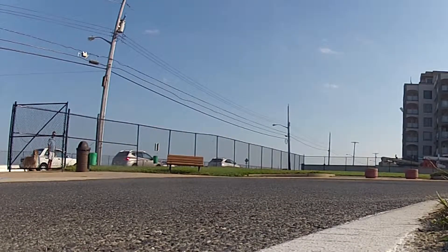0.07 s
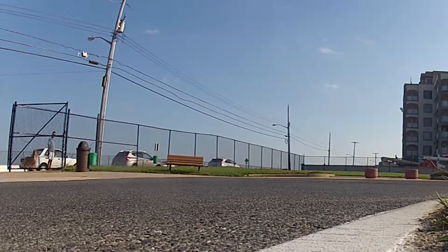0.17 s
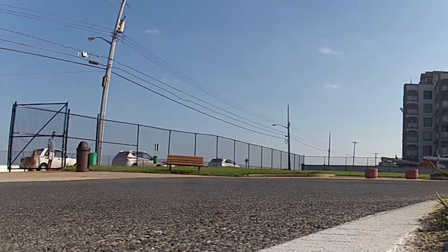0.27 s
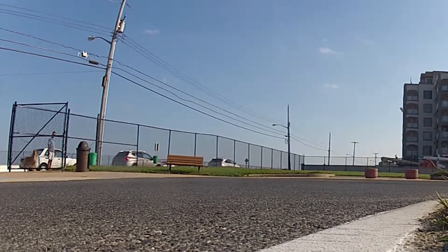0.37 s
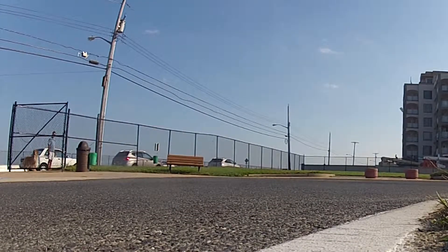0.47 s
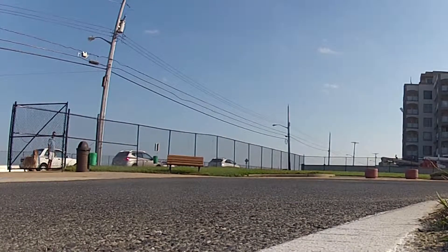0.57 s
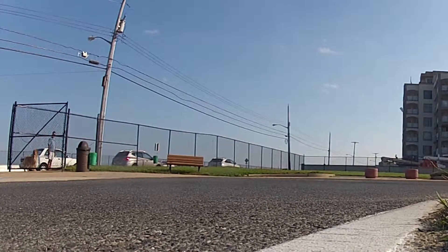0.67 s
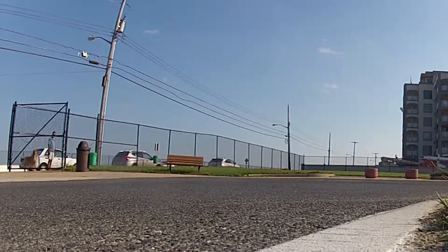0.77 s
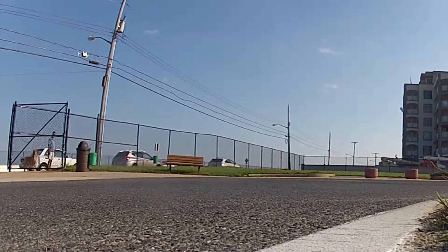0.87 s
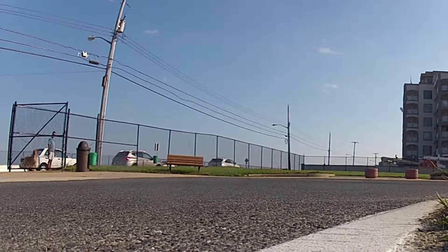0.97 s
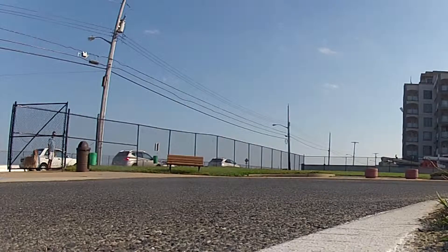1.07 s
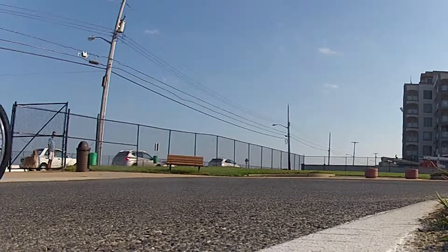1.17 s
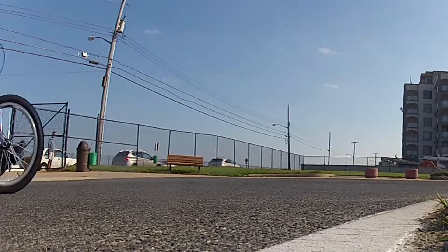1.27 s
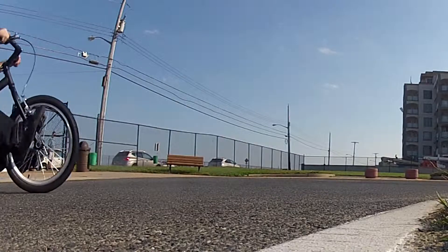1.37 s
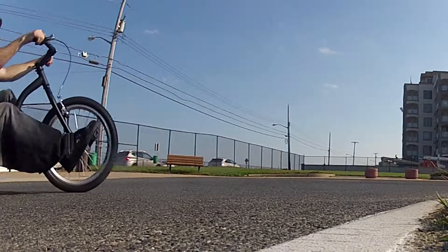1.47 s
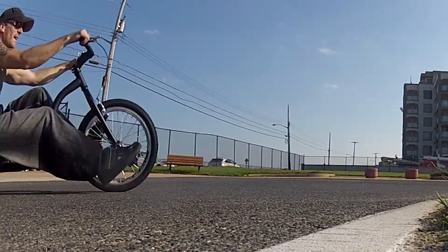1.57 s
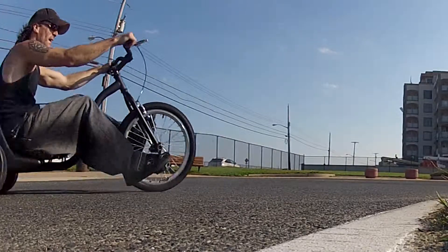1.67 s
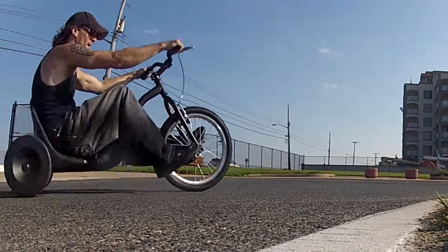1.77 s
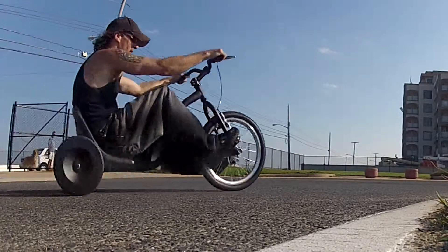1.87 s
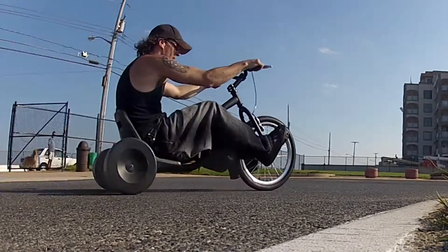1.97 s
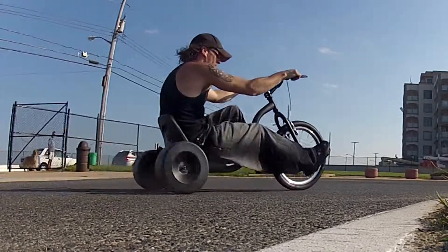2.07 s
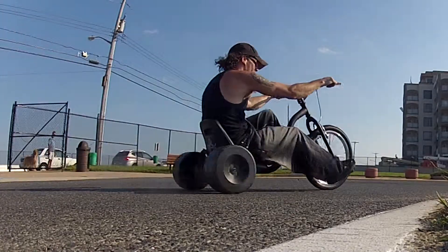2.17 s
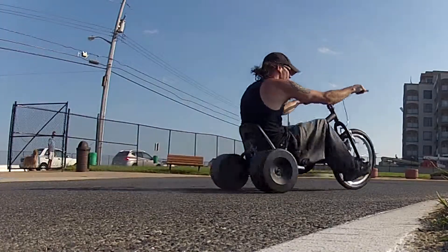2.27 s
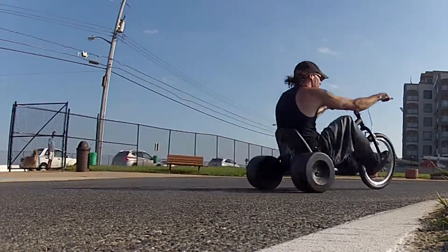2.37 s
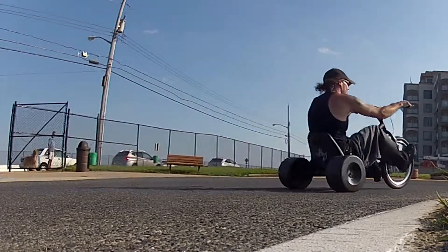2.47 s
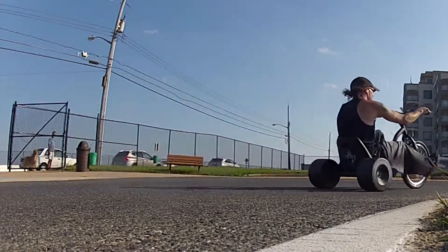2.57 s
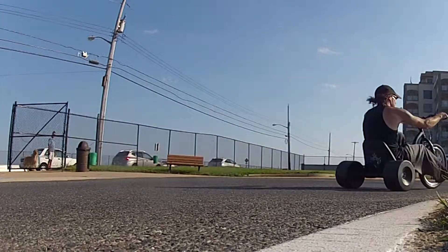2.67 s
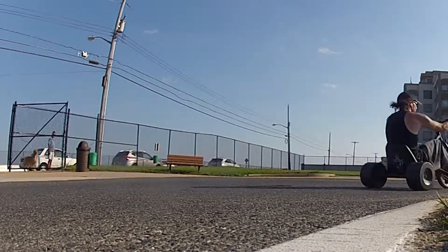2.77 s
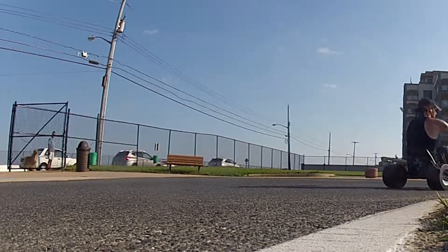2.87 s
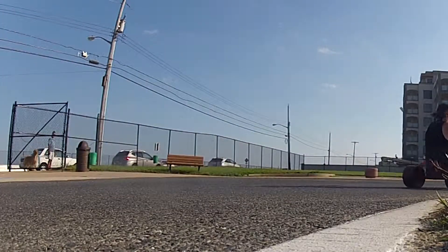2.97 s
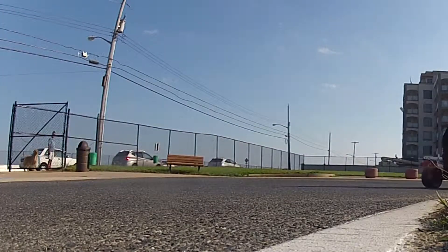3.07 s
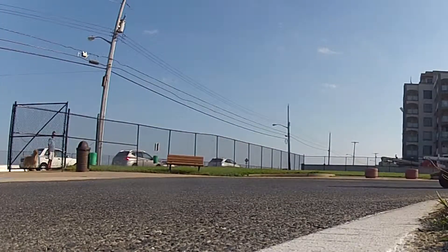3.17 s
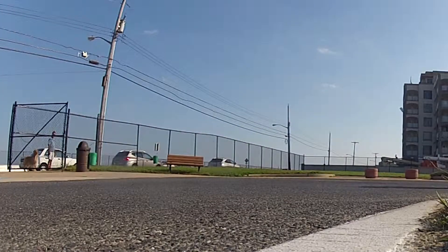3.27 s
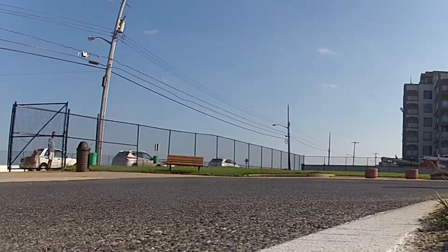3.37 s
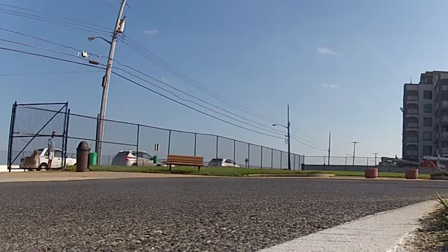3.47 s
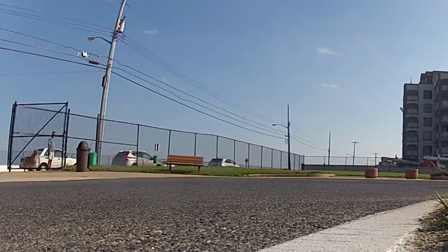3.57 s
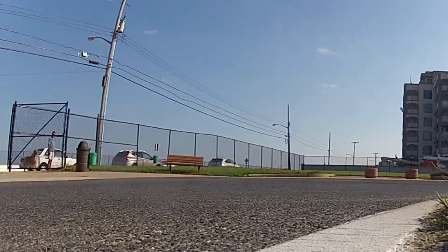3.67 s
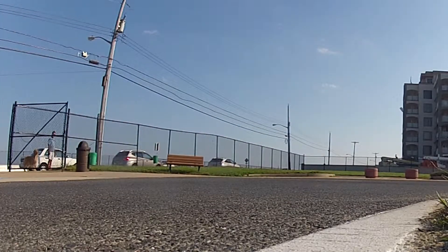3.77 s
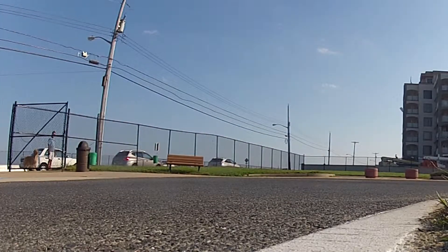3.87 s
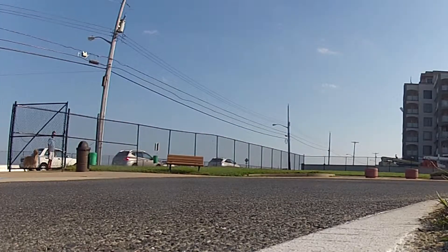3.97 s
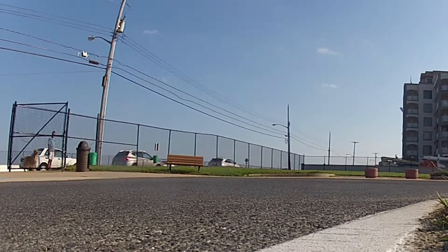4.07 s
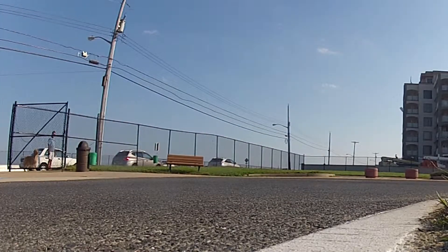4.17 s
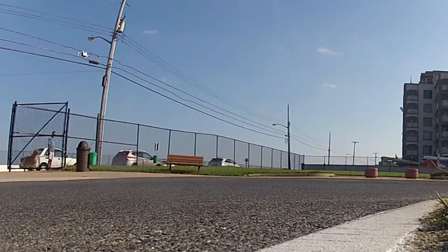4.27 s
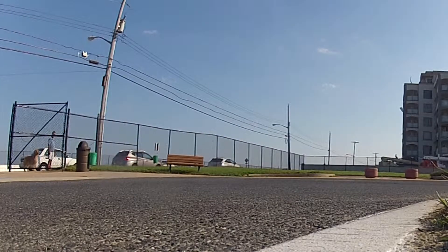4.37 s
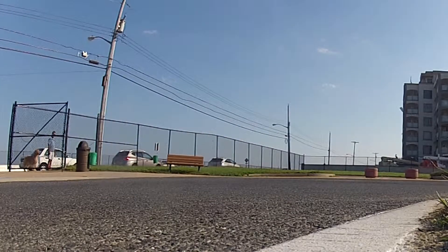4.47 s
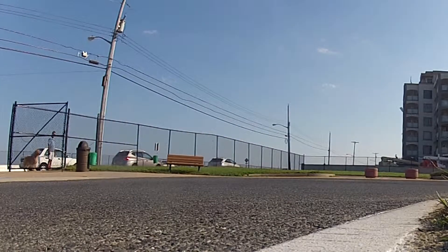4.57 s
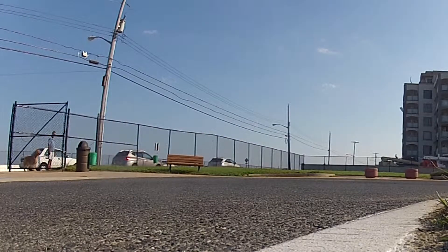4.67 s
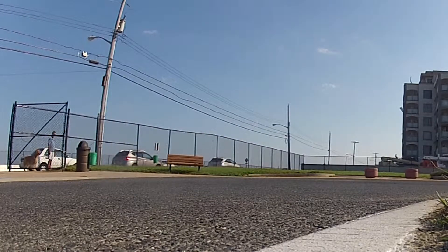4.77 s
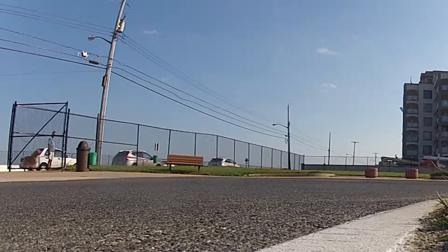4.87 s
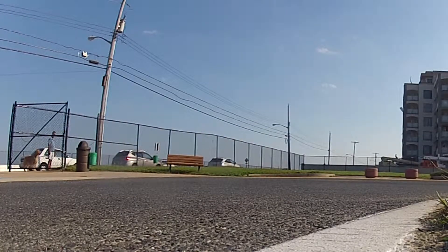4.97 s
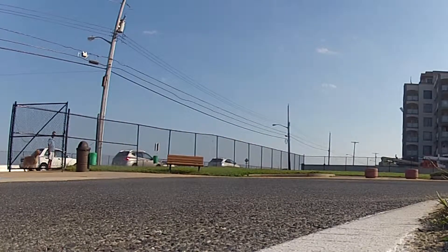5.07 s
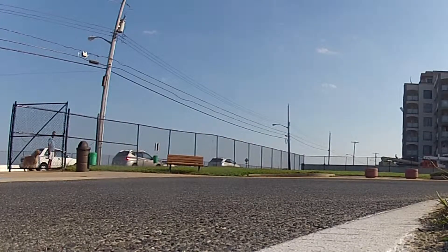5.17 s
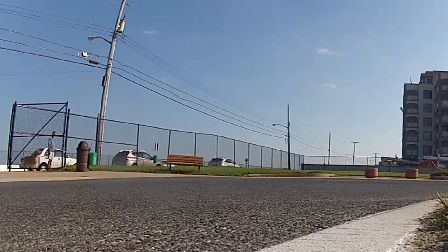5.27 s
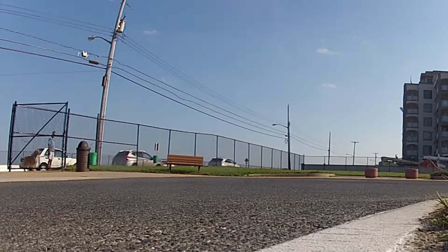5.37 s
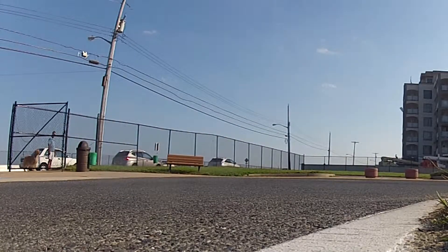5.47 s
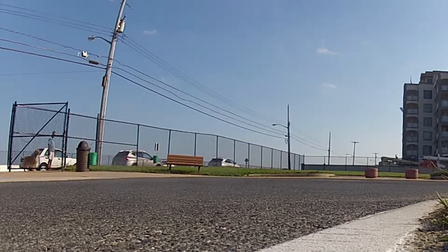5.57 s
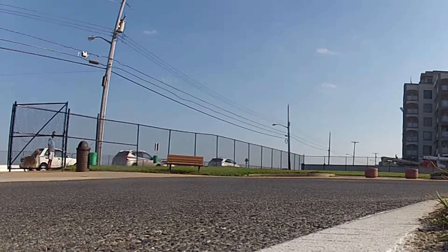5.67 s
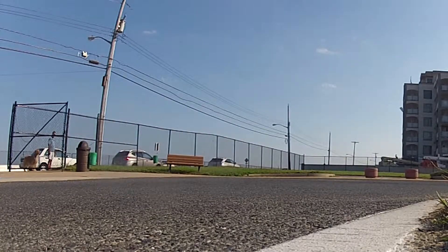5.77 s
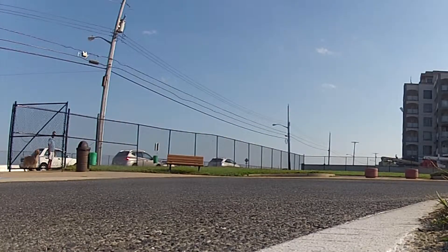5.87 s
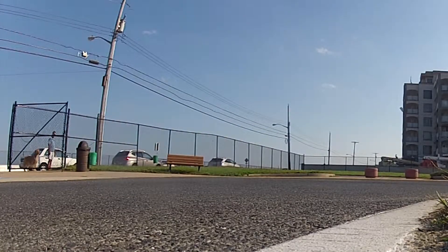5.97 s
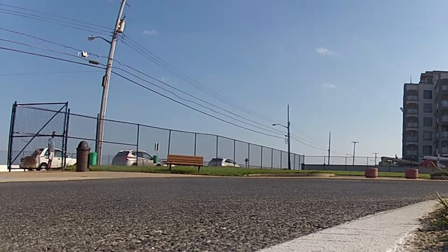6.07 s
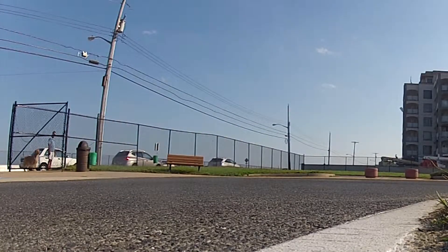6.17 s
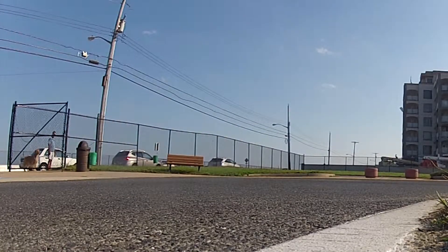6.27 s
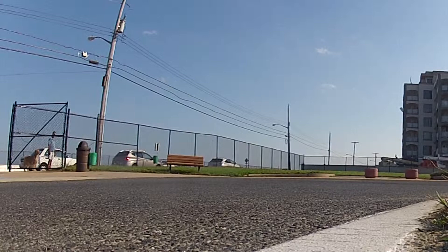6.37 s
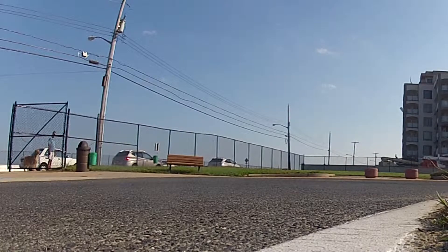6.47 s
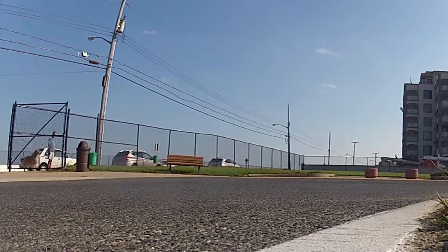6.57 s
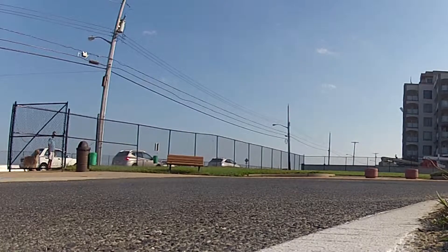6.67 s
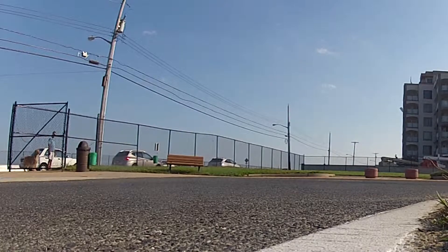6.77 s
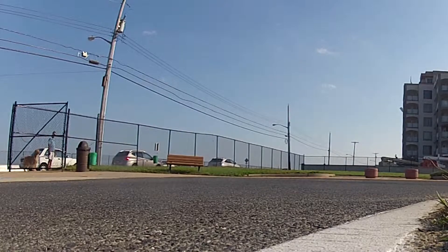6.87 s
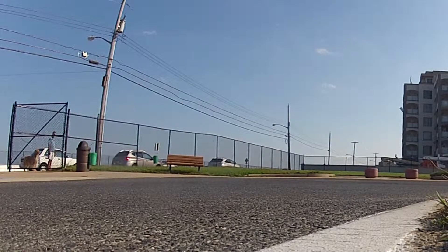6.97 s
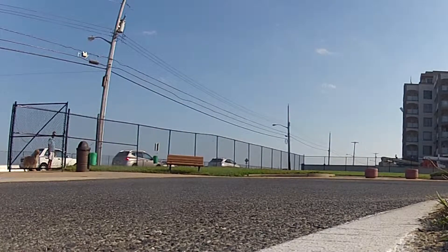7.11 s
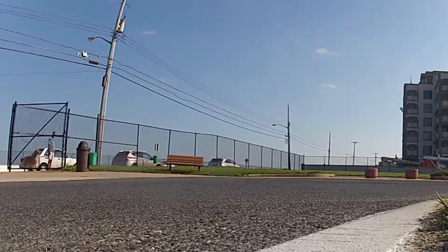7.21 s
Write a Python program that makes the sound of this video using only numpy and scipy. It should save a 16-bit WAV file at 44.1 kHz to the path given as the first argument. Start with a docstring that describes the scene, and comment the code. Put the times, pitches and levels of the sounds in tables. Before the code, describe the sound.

A trike approaches on an open asphalt road, heard from a microphone on the ground. From the start its hollow plastic rear wheels drum on the rough surface, growing louder, while loose stones snap sharply, most strongly at about 0.6 and 1.3 seconds. It passes close between 1.5 and 2.3 seconds with a booming rumble, a few knocks and a light hiss. As it rolls away there is a fine sandy scrape, with more stone cracks near 2.9 and 3.4 seconds. The rolling fades until about 5.2 seconds, when the wheels skid further off with a hollow, grinding groan and several thumps. The skid bites twice and ends abruptly at around 6.2 seconds. A faint gritty scuff follows near 7 seconds. A soft, low outdoor rush and a distant motor drone continue throughout, and the brighter sounds carry a thin fizz.

```python
"""An asphalt road in the open, one microphone standing on it. A drift trike coasts past at about 2 m,
then slides round further off. Its hollow plastic rear wheels drum on the road's grain, scrape,
thump over bumps and crack loose grit. A motor drones far away.
The recorder samples slowly and holds each sample, which adds a thin fizz."""
import sys
import numpy as np
from scipy import signal
from scipy.fft import rfft, irfft
from scipy.io import wavfile
from scipy.ndimage import uniform_filter1d

SR = 44100
rng = np.random.default_rng(int(sys.argv[2]) if len(sys.argv) > 2 else 0)


def wav_out(sig):
    """Save sig, one row per channel (or a flat mono array), as 16-bit PCM at SR to the path in sys.argv[1]."""
    wavfile.write(sys.argv[1], SR, np.round(np.clip(np.atleast_2d(sig).T, -1, 1) * 32767).astype(np.int16))


N = 319284
TIME = np.arange(N) / SR
SPEED_M_PER_S, CLOSEST_M = 3.03, 2.09  # the straight run past the microphone


def amp(db):
    """Decibels to gain."""
    return 10 ** (np.asarray(db) / 20)


def unit(x):
    """Scales to rms 1."""
    return x / np.sqrt(np.mean(x ** 2) + 1e-20)


def add(mix, s, sound):
    """Mixes a sound in at time s."""
    part = mix[max(round(s * SR), 0):][:len(sound)]
    part += sound[:len(part)]


def arch(start_s, length_s):
    """Rises from 0 to 1 and falls back within the given stretch."""
    return np.sin(np.pi * np.clip((TIME - start_s) / length_s, 0, 1))


def wander(top_hz):
    """Random drift of rms 1, rolled off above top_hz."""
    hz = np.fft.rfftfreq(N, 1 / SR)
    return unit(irfft(rfft(rng.standard_normal(N)) / (1 + (hz / top_hz) ** 4), N))


def colour(x, spectrum, order=4096):
    """Causal filter with the given spectrum: clicks ring after, never before."""
    hz, db = np.transpose(spectrum)
    bin_hz = abs(np.fft.fftfreq(order, 1 / SR))
    log_gain = np.log(amp(np.interp(np.log(bin_hz + 1), np.log(hz), db)))
    taps = np.fft.ifft(np.exp(np.conj(signal.hilbert(log_gain)))).real[:order // 2]
    return signal.oaconvolve(x, taps)[:len(x)]


def resonate(x, hz, width_hz):
    """A resonance of gain about 1 whose pitch may follow a curve."""
    turn = np.exp(2j * np.pi * np.cumsum(hz * np.ones(len(x))) / SR)
    pole = np.exp(-np.pi * width_hz / SR)
    return 2 * (turn * signal.lfilter([1 - pole], [1, -pole], x / turn)).real


def steadied(x, size):
    """Evens out the level over size samples, leaving the fast grain."""
    return x / np.sqrt(np.maximum(uniform_filter1d(x ** 2, size), 0) + 1e-12)


def grain(per_s, spread_db):
    """Random tiny blows from the road's grain; spread_db makes their sizes uneven."""
    size = amp(spread_db * np.minimum(rng.exponential(1, N), 4))
    return unit(size * rng.choice([-1, 1], N) * (rng.random(N) < per_s / SR))


def doublings(nearest_s):
    """How many times the distance has doubled from its least, before and after nearest_s."""
    along_m = SPEED_M_PER_S * (TIME - nearest_s)
    far = np.log2(np.hypot(along_m, CLOSEST_M) / CLOSEST_M)
    return far * (along_m < 0), far * (along_m >= 0)


def passing(loudest_s, db, coming_db, going_db):
    """Gain of a sound passing the microphone; it loses coming_db or going_db per doubling of distance."""
    coming, going = doublings(loudest_s)
    onset_db = -np.maximum(1 - TIME / 0.8, 0)  # a little softer at first
    return amp(db + onset_db - coming_db * coming - going_db * going)


# spectra of a hollow plastic wheel, rolling and skidding: f/Hz, level/dB
ROLL_SPECTRUM = [(88, -37), (150, -15), (204, -9), (240, -2), (286, -2.5), (331, -4), (389, -0.5),
                 (491, -4.5), (584, -1), (708, -13), (883, -25), (972, -22), (1160, -33.5), (1500, -32),
                 (1950, -56), (3300, -120)]
SKID_SPECTRUM = [(70, -44.5), (130, -6.5), (200, -14), (270, -6), (390, -1.5), (460, -0.5), (540, -2),
                 (620, -8), (700, -9.5), (820, -15.5), (1000, -28.5), (1250, -34), (1600, -52.5),
                 (2400, -82)]
# rough patches of asphalt that drum louder: t/s, length/s, gain/dB
ROUGH_PATCHES = [(0.34, 0.086, 8), (0.633, 0.096, 6.5), (2.035, 0.16, 4.5), (3.292, 0.063, 7),
                 (4.207, 0.098, 5)]
# the skid, far from the microphone, biting twice and ending abruptly: t/s, level/dB
SKID_LEVEL = [(5.19, -42), (5.25, -24.5), (5.34, -26.5), (5.39, -33.5), (5.54, -24), (5.86, -26),
              (5.98, -29), (6.21, -28.5), (6.29, -54)]
# hardness of the road's blows on the wheels: t/s, tilt/(dB per octave)
BLOW_HARDNESS = [(0, -1), (1.85, -4), (2.3, -1.5), (3.2, 0), (4.0, 3.5), (4.3, 3), (5.5, -2), (6.05, 0.5),
                 (7.24, -4.5)]


def wheels():
    """The road's grain drums on the plastic shells; in the skid the blows are fewer and ring higher."""
    road_db = sum(db * arch(start, length) for start, length, db in ROUGH_PATCHES)
    road_db += 0.5 * wander(top_hz=9)
    slowing_db = -4.5 * np.clip((TIME - 4.27) / 0.51, 0, 1)  # turning into the skid
    roll_gain = passing(loudest_s=2, db=-22, coming_db=11, going_db=4.5) * amp(road_db + slowing_db)
    skid_s, skid_db = np.transpose(SKID_LEVEL)
    skid_gain = amp(np.interp(TIME, skid_s, skid_db)) * (TIME > skid_s[0]) * (TIME < skid_s[-1])
    rolling = unit(colour(grain(per_s=1300, spread_db=0.5), ROLL_SPECTRUM))
    skidding = unit(colour(grain(per_s=450, spread_db=1.0), SKID_SPECTRUM))
    groan = unit(resonate(skidding, 556, 35))
    level = np.hypot(roll_gain, skid_gain)
    drumming = (roll_gain * rolling + skid_gain * unit(skidding + amp(-8.5) * groan)) / level
    # harder blows tilt the spectrum upward about 450 Hz
    hz, frame_s, spectra = signal.stft(drumming, SR, nperseg=512)
    octaves = np.log2(np.clip(hz, 150, 1000) / 450)[:, None]
    tilt_db = np.interp(frame_s, *np.transpose(BLOW_HARDNESS)) * octaves
    tilted = signal.istft(spectra * amp(tilt_db), SR, nperseg=512)[1][:N]
    return level * steadied(tilted, size=3001)


# lowest modes of wheels and frame: f/Hz, width/Hz, level/dB
BODY_MODES = [(109.6, 22, -7), (143, 91, -10.5), (236.2, 17.6, 3), (396, 52, -14), (431.4, 23, -5),
              (526, 28.5, -3)]


def boom():
    """Wheels and frame ring under the road's blows, swelling close to the microphone."""
    blows = grain(per_s=820, spread_db=3.0)
    ring = sum(amp(db) * unit(resonate(resonate(blows, hz, width), hz, 3 * width))
               for hz, width, db in BODY_MODES)
    return passing(loudest_s=1.74, db=-25, coming_db=14, going_db=8.5) * steadied(ring, size=8001)


def rumble():
    """The frame rumbles dully over the road, most of all on the way in."""
    blows = grain(per_s=520, spread_db=-0.5)
    frame = unit(resonate(resonate(blows, 127, 70), 150, 110))
    return passing(loudest_s=1.5, db=-36, coming_db=3, going_db=6) * frame


# larger bumps in the asphalt: t/s, relative level/dB, leading mode f/Hz, thud share/dB
BUMPS = [(0.3648, -15, 210, 5), (1.1, -17, 527, 1), (1.434, -5, 415, -10), (1.489, -14, 415, -17),
         (1.792, -13.5, 566, -20), (2.075, -10, 582, -12), (2.123, -8.5, 355, -9), (2.883, -12.5, 390, -11),
         (3.12, -19, 579, -10), (3.31, -9, 602, -1), (3.553, -15, 369, -19), (3.597, -17.5, 358, -20),
         (4.244, -18.5, 638, -17), (5.364, -18, 607, -13), (5.545, -10, 431, -32), (5.582, -15, 527, -18),
         (5.603, -15.5, 506, -12), (5.648, -7, 402, -19), (5.838, -7, 523, -16), (6.038, -10, 457, -5),
         (6.104, -7, 522, -16), (6.185, -17, 552, 7)]


def thumps():
    """A bump knocks the wheel: one mode leads, the shell rattles with it and the frame thuds."""
    out, t = np.zeros(N), np.arange(5000) / SR
    for s, db, hz, thud_db in BUMPS:
        shell = unit(colour(rng.standard_normal(len(t)) * np.exp(-t / 0.0064), SKID_SPECTRUM))
        mode = unit(np.sin(2 * np.pi * hz * t) * (1 - np.exp(-t / 0.00034)) ** 2 * np.exp(-t / 0.016))
        shake = rng.standard_normal(len(t)) * np.exp(-t / 0.056)
        thud = unit(resonate(resonate(shake, 130, 150), 130, 190))
        add(out, s, amp(db - 17.5) * unit(shell + amp(1) * mode + amp(thud_db) * thud))
    return out


# spectrum of snapping stone: f/Hz, level/dB
STONE_SPECTRUM = [(300, -26), (950, -49.5), (1450, -10), (1700, -7), (2000, -1), (2350, -1.5), (2900, 1),
                  (3400, -3), (3650, -8.5), (4050, -4), (4500, -2), (5000, -7), (5700, -8)]
# larger stones under the wheels: t/s, relative level/dB, low ring f/Hz, its share/dB, high ring f/Hz
STONES = [(0.298, -20.5, 2020, 4.5, 4030), (0.3045, -22, 2030, 7, 4300), (0.3714, -25, 2260, 0, 4630),
          (0.4451, -18, 2590, 0, 4200), (0.6064, -7, 2120, 4.5, 4780), (0.6579, -6, 2900, 2, 4230),
          (0.6928, -21.5, 2910, 1, 3360), (0.8687, -15.5, 1930, -26, 3930), (0.8773, -18, 2130, -19, 4800),
          (0.9241, -20, 2080, 2.5, 3900), (1.035, -26.5, 2290, -18, 4040), (1.1523, -20.5, 2970, -2, 3730),
          (1.2504, -10, 3170, -8, 4420), (1.3032, -1, 1980, 1, 3930), (1.4047, -12.5, 2900, -15, 4100),
          (1.805, -30.5, 1890, -3, 5100), (1.9667, -29.5, 1850, 10, 5000), (2.2534, -20.5, 2020, -15, 4630),
          (2.417, -21.5, 2840, 0, 4520), (2.642, -24.5, 2850, -3, 3960), (2.6757, -22.5, 1970, -13, 3760),
          (2.928, -2, 1970, -28, 3690), (3.1682, -19, 1930, -7, 3830), (3.2973, -18.5, 2280, -0.5, 3660),
          (3.404, -6.5, 2960, -10, 3720), (3.8135, -25, 1600, 4.5, 3500), (3.8526, -33, 2120, 5, 3670),
          (4.6952, -37, 2040, -2, 3670), (6.043, -36.5, 2890, -1, 3660)]


def cracks():
    """A pinched stone snaps twice, rings at two pitches, knocks the wheel and leaves a duller tail."""
    out, t = np.zeros(N), np.arange(3000) / SR
    first_break = (1 - np.exp(-t / 0.00023)) * np.exp(-t / 0.0013)
    ring_envelope = (1 - np.exp(-t / 0.00042)) * np.exp(-t / 0.0025)
    for s, db, low_hz, low_db, high_hz in STONES:
        fracture, rattle = rng.standard_normal((2, len(t)))
        second_break = np.interp(t - rng.uniform(0.0023, 0.0025), t, first_break, left=0)
        snap = unit(colour(fracture * (first_break + amp(-5.5) * second_break), STONE_SPECTRUM))
        low = amp(low_db) * unit(np.sin(2 * np.pi * low_hz * t) * ring_envelope)
        high = amp(-3) * unit(np.sin(2 * np.pi * high_hz * t) * ring_envelope)
        rattle = rattle * (1 - np.exp(-t / 0.007)) * np.exp(-t / 0.006)
        tail = unit(resonate(colour(rattle, STONE_SPECTRUM), 1780, 1100))
        blow = fracture * first_break + 0.25 * rattle
        knock = amp(-13) * unit(resonate(resonate(blow, 900, 700), 660, 900))
        add(out, s, amp(db - 21) * unit(snap + amp(-2) * (low + high) + amp(-7.5) * tail + knock))
    return out


# spectrum of plastic sliding on asphalt: f/Hz, level/dB
SCRAPE_SPECTRUM = [(470, -22.5), (800, -8), (1130, -14.5), (2020, -4.5), (2380, -9.5), (2970, -6.5),
                   (3410, -18.5), (3700, -14.5), (4920, -16.5), (5600, -28.5), (7280, -53), (12300, -120)]


def scrape(sliding):
    """Fine sandy friction under the sliding plastic, and a band of hiss from the front tyre."""
    sand = unit(colour(rng.standard_normal(N), SCRAPE_SPECTRUM))
    near_gain = sliding * passing(loudest_s=3, db=-43, coming_db=4.5, going_db=17.5)
    far_gain = np.hypot(amp(-62), amp(-57.5) * arch(4.75, 2.66))  # slides on faintly out of the skid
    coming, going = doublings(nearest_s=1.88)
    tyre_hz = 1850 + 220 * coming + 950 * going  # lowest beside the microphone
    hiss = unit(resonate(resonate(grain(per_s=6000, spread_db=7.0), tyre_hz, 400), tyre_hz, 800))
    hiss_gain = passing(loudest_s=2.5, db=-41, coming_db=10, going_db=73)
    flutter_db = 1.76 * wander(top_hz=40)
    return amp(flutter_db) * (np.hypot(near_gain, far_gain) * sand + hiss_gain * hiss)


# scuffs over loose grit: t/s, length/s, level/dB
GRIT_SCUFFS = [(1.384, 0.074, -45), (2.188, 0.16, -44.5), (3.74, 0.22, -54), (4.02, 0.12, -64),
               (6.864, 0.14, -54), (6.958, 0.42, -54.5)]


def crunch():
    """Smaller grit crunches sparsely as the trike passes, and thickly in each scuff."""
    t = np.arange(600) / SR
    snap = rng.standard_normal(len(t)) * np.exp(-t / 0.0084)

    def crushed(blows):
        snaps = signal.oaconvolve(blows, snap)[:N]
        return unit(resonate(colour(snaps, STONE_SPECTRUM), 1400, 1200))

    sparse = crushed(grain(per_s=130, spread_db=8.5))
    thick = crushed(grain(per_s=820, spread_db=4.5))
    scuff_gain = sum(amp(db) * arch(start, length) for start, length, db in GRIT_SCUFFS)
    return passing(loudest_s=2.5, db=-53, coming_db=6, going_db=11) * sparse + scuff_gain * thick


def chips():
    """Single grains snap with a brief, bright tick while the wheels face the microphone."""
    t = np.arange(400) / SR
    snap = rng.standard_normal(len(t)) * np.exp(-t / 0.0019)
    snaps = signal.oaconvolve(grain(per_s=34, spread_db=0.5), snap)[:N]
    ticks = unit(resonate(colour(snaps, STONE_SPECTRUM), 3500, 3000))
    return passing(loudest_s=0.9, db=-58.5, coming_db=1, going_db=16) * ticks


# partials of the motor, far from the microphone: f/Hz, level/dB
MOTOR_PARTIALS = [(40.3, -51), (80.6, -37.5), (107.7, -55.5), (121, -46), (241, -53), (350, -68),
                  (1491, -70), (1620, -70.5), (2003, -69)]


def distant_motor():
    """A motor drones: its partials waver together in pitch and each flickers in level."""
    wavering_s = np.cumsum(1 + 0.0129 * wander(top_hz=3.85)) / SR
    out = np.zeros(N)
    for hz, db in MOTOR_PARTIALS:
        gain = amp(db + 0.49 * wander(top_hz=22))
        out += gain * unit(np.sin(2 * np.pi * (hz * wavering_s + rng.random())))
    return out


# open-air ambience around the microphone: f/Hz, level/dB
AIR_SPECTRUM = [(12, -34), (20, -23), (86, -1.5), (107, -3), (163, -11.5), (232, -9.5), (518, -14),
                (1030, -41), (1180, -30), (1720, -46), (2030, -31.5), (2960, -51), (3410, -54), (4860, -58),
                (5600, -58), (7280, -76), (12300, -120)]


def open_air():
    """A soft, low outdoor rush whose level drifts slowly."""
    gain = amp(-37 + 0.79 * wander(top_hz=0.78))
    return gain * unit(colour(rng.standard_normal(N), AIR_SPECTRUM, order=16384))


def scene():
    """The trike and its surroundings at one microphone on the road."""
    sliding = amp(-5 * arch(1.45, 0.9))  # beside the microphone the wheels run straight and scrape less
    body = wheels() + boom() + rumble() + thumps()
    surface = cracks() + scrape(sliding) + sliding * crunch() + chips()
    return (body + surface + distant_motor() + open_air())[None]


def record(dry):
    """The recorder samples at 12 kHz and holds each value, mirroring the sound around 12 kHz."""
    slow = signal.resample_poly(dry, 40, 147, axis=1, window=("kaiser", 7))
    held = np.repeat(slow, 4, axis=1)  # steps at 48 kHz
    fizzy = signal.resample_poly(held, 147, 160, axis=1)[:, :N]
    low_pass = signal.firwin(121, 15400, window=("kaiser", 9), fs=SR)
    return signal.oaconvolve(fizzy, low_pass[None], "same")


dry = scene()
out = record(dry)
wav_out(out)
```